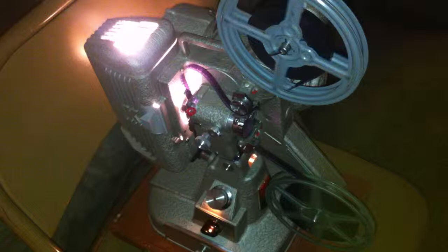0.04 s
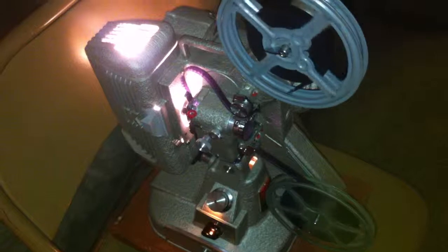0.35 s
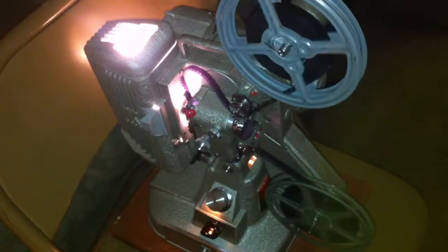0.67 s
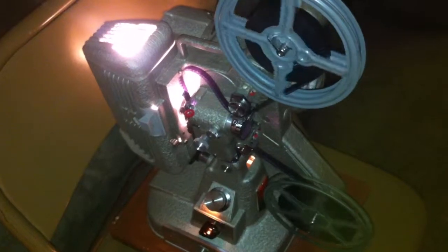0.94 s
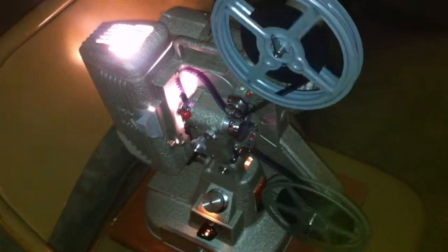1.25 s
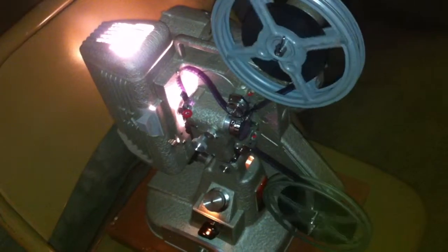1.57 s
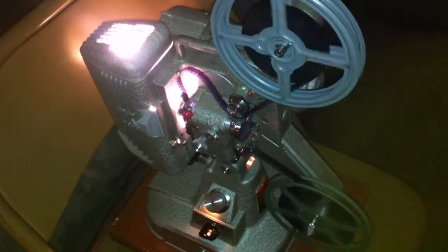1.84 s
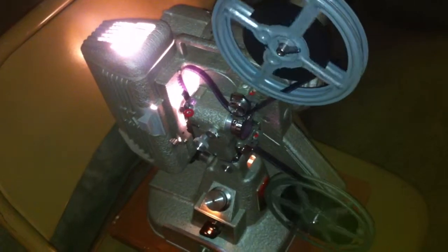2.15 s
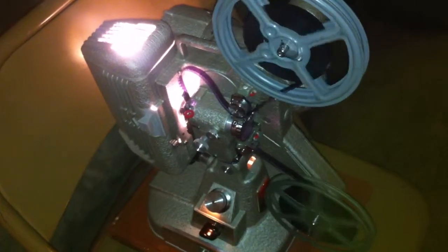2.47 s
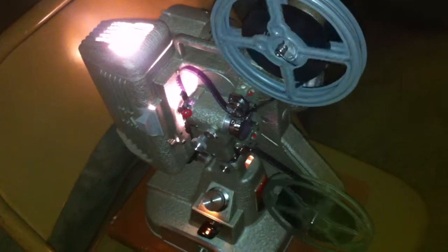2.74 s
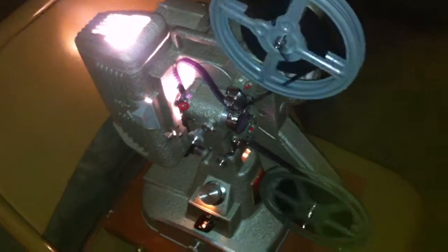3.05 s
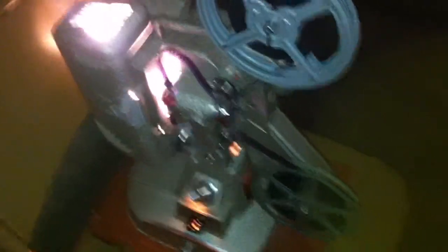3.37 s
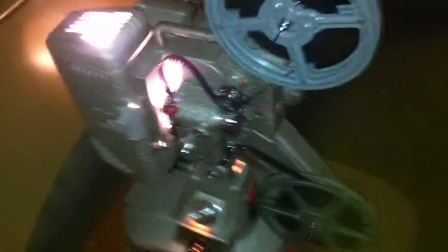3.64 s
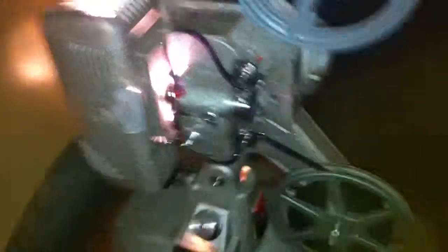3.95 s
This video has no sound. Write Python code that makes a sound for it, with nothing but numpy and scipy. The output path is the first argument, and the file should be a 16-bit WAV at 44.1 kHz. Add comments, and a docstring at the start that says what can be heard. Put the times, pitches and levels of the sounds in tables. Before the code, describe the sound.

Close up in a quiet room, a film projector clatters in a rapid, regular rhythm while its motor whirs and the film rustles. Two soft low bumps pass, then the tone turns a little brighter as the microphone moves nearer.

```python
"""A small film projector runs close to a mono microphone in a quiet room.
The sound cuts in at 0.12 s: motor, gears and belt whine, the fan blows and the film rustles.
Once per picture the cam knocks the housing, the claw snaps at the film, the gears rattle and the
film flicks. Soft low bumps come at 0.23 s and 2.25 s, and a fainter one at 2.8 s.
From 3.4 s the microphone comes closer and the sound brightens a little."""
import sys
import numpy as np
from scipy import signal
from scipy.fft import rfft, irfft
from scipy.io import wavfile

SR = 44100
rng = np.random.default_rng(int(sys.argv[2]) if len(sys.argv) > 2 else 0)


def bounce(signal):
    """Save signal as a 16-bit WAV file at the path given by the first command-line argument."""
    frames = np.transpose(np.atleast_2d(signal))
    limited = np.clip(frames, -1, 1)
    pcm = np.round(limited * 32767).astype(np.int16)
    wavfile.write(sys.argv[1], SR, pcm)


N = 176400
T = np.arange(N) / SR

PICTURE_HZ, MOTOR_HZ, MAINS_HZ, GEAR_TURNS_PER_PICTURE = 15.5155, 75.88, 60, 3
START_S, MOVE_S, MOVE_LENGTH_S = .119, 3.4, .35
FAN_DB, RUSTLE_DB, KNOCK_DB, BACKLASH_DB, CLAW_DB, FLICK_DB = -40, -40.5, -43.5, -45.5, -43.2, -47

# Harmonics of motor shaft, gear shaft and mains (order, level/dB)
MOTOR_HARMONICS = [(2, -58.5), (3, -59.5), (5, -62), (8, -59), (9, -53), (10, -55), (11, -52), (12, -49.7),
                   (14, -52), (16, -55), (24, -55.5)]
GEAR_HARMONICS = [(12, -62), (22, -49), (25, -54), (26, -54), (27, -55.5), (32, -57), (33, -53), (34, -47),
                  (36, -56), (42, -62), (47, -62), (56, -60)]
MAINS_HARMONICS = [(2, -62), (4, -68)]
# Tones of belt and pulleys (f/Hz, level/dB)
BELT_TONES = [(269.5, -62), (639.4, -55), (727.1, -47.3), (743, -58), (1000, -54.5), (1150, -57),
              (1335, -58), (1607.8, -48.3)]
# Modes of housing, claw and small steel parts (f/Hz, bandwidth/Hz, level/dB)
HOUSING_MODES = [(246, 76, -55), (714, 39, -51), (1190, 31, -56), (1655, 33, -45)]
CLAW_MODES = [(4300, 350, -59), (4980, 260, -54), (5730, 190, -52), (8230, 260, -59), (11150, 350, -58.5)]
STEEL_MODES = [(3646, 20, -63), (5035, 110, -54.5), (5600, 170, -57), (7135, 30, -63), (8048, 28, -55),
               (8805, 30, -58), (9115, 50, -60), (10098, 50, -58)]
# Spectral envelopes of the noises and impacts (f/Hz, relative level/dB)
FAN_SPECTRUM = [(25, 2), (60, -48), (100, -27), (170, -11.5), (280, -8.5), (350, -17.5), (500, -1.5),
                (700, -2.5), (870, -13.5), (1250, 4.5), (1450, -3.5), (2250, 0), (2500, -3.5),
                (3100, -13.5), (5000, -6.5), (15000, -58.5)]
RUSTLE_SPECTRUM = [(2000, -15), (3300, -21.5), (3900, -3.5), (4400, -11.5), (6300, -2.5), (7600, 1),
                   (9000, 2), (9500, -0.5), (10000, 3.5), (11000, -1), (12000, -2.5), (13000, -4),
                   (13500, -7), (14000, -2), (15500, -8)]
KNOCK_SPECTRUM = [(300, -25), (900, -4.5), (1350, -3.5), (1650, -2.5), (2000, -2), (2350, -10.5),
                  (2900, -10), (4000, -32.5), (9000, -31.5)]
BACKLASH_SPECTRUM = [(100, -26.5), (400, -7), (700, 1.5), (900, 2), (1200, 3.5), (1450, -8), (2500, -16.5),
                     (6000, -50.5)]
CLAW_SPECTRUM = [(500, -16), (3400, -17), (4100, -7), (5000, -4), (5400, -4), (5750, -3), (6000, -3),
                 (6300, -9), (7700, -6), (8300, -1), (9100, -3), (9600, -8), (10500, -2.5), (11200, -.5),
                 (12000, -4), (13000, -9), (14200, -9), (15200, -1.5), (15700, -5)]
FLICK_SPECTRUM = [(1000, -33), (3200, -2.5), (4200, -10.5), (5500, 11.5), (6500, -15), (8500, 3),
                  (11000, -3.5), (13500, -9), (15500, 1.5)]
# The belt runs slightly ahead and behind (t/s, lag/ms)
BELT_LAG = [(.3, .1), (1.2, -.6), (1.7, .4), (2.5, .6), (3.35, 0), (3.6, -.7), (4, -.2)]
# Impacts of cam and shutter, gears, claw and film in one picture cycle (t/ms, relative level/dB)
CAM_KNOCKS = [(-1.2, -7), (3.8, -12), (6, -10), (9.8, -3), (14, -6), (16.6, 1), (18.4, -1), (20.4, -3),
              (28, -2), (38.3, -9), (40.7, -2), (42.4, -8), (46.8, -6), (49.7, -2), (53.2, -8)]
GEAR_KNOCKS = [(-0.5, -1), (3.5, -2.5), (10, -4), (15.5, -29.5), (25, -1), (32, -17.5), (41, -9.5),
               (46, -5.5)]
CLAW_STRIKES = [(-.65, 0), (.45, -5), (1.45, -5.5), (2.6, -10)]
FILM_FLICKS = [(5.8, -4), (11.2, -3), (15.8, -6), (18.9, 0), (21, -8), (31.6, -1), (35, -7), (48.1, -3),
               (50.9, -1), (54.5, -7)]
# Gains as the microphone moves (t/s, mechanism level/dB, gate level/dB, rustle level/dB)
MICROPHONE_GAINS = [(.12, -0.2, -2, 0.5), (1, -0.2, 0, -0.7), (1.8, -0.36, -0.5, -0.2), (2.5, 0, .5, -0.6),
                    (3.3, 0.3, -1, 0.4), (4, -0.64, -0.5, -0.5)]
# Soft low bumps (t/s, level/dB)
LOW_BUMPS = [(0.234, -41), (2.25, -42), (2.8, -55)]
# Change of spectrum close to the film path (f/Hz, level/dB)
CLOSE_RESPONSE = [(100, 1), (1700, -0.5), (2300, 3.5), (3300, 2.5), (4100, -1), (5800, 0.5), (6300, 3.5),
                  (7100, 5), (8400, 2), (10300, -1), (12000, 1), (13300, 1), (15500, 0)]


def amp(db):
    """Amplitude ratio of a level in decibels."""
    return 10 ** (np.asarray(db) / 20)


def unit(x):
    """Normalisation to rms 1."""
    return x / np.sqrt(np.mean(x ** 2) + 1e-20)


def drift(cutoff_hz):
    """Random fluctuation: low-passed Gaussian noise of rms 1."""
    f = np.fft.rfftfreq(N, 1 / SR)
    return unit(irfft(rfft(rng.standard_normal(N)) * (f > 0) / (1 + (f / cutoff_hz) ** 2), N))


def colour(x, spectrum):
    """Minimum-phase filtering imposes a spectral envelope causally; the result has rms 1."""
    hz, db = np.transpose(spectrum)
    f = abs(np.fft.fftfreq(4096, 1 / SR))
    log_gain = np.log(amp(np.interp(np.log(f + 1), np.log(hz), db)))
    taps = np.fft.ifft(np.exp(np.conj(signal.hilbert(log_gain)))).real
    return unit(signal.oaconvolve(x, taps[:len(taps) // 2])[:N])


def ring(force, modes):
    """Modal superposition: each mode answers the force as a damped resonator."""
    out = np.zeros(N)
    for hz, bandwidth, db in modes:
        radius = np.exp(-np.pi * abs(bandwidth) / SR)
        feedback = [1, -2 * radius * np.cos(2 * np.pi * hz / SR), radius ** 2]
        out += amp(db) * unit(signal.lfilter([1, 0, -1], feedback, force))
    return out


def tones(hz, harmonics, wander, flutter_db):
    """Periodic motion gives harmonics; speed modulates their frequency and load their level."""
    turns = np.cumsum(hz * (1 + wander * drift(2.3))) / SR
    out = np.zeros(N)
    for order, db in harmonics:
        peak = np.sqrt(2) * amp(db + flutter_db * drift(11))
        out += peak * np.sin(2 * np.pi * (round(order) * turns + rng.random()))
    return out


def drive():
    """Forced vibration: motor, gears, belt and mains sound their tones and keep the housing ringing."""
    motor = tones(MOTOR_HZ, MOTOR_HARMONICS, wander=.0015, flutter_db=1.5)
    gears = tones(GEAR_TURNS_PER_PICTURE * PICTURE_HZ, GEAR_HARMONICS, wander=.0013, flutter_db=3)
    belt = sum(tones(hz, [(1, db)], wander=.00192, flutter_db=1.1) for hz, db in BELT_TONES)
    hum = tones(MAINS_HZ, MAINS_HARMONICS, wander=.00009, flutter_db=2.5)
    return motor + gears + belt + hum + ring(rng.standard_normal(N), HOUSING_MODES)


def fan():
    """Turbulence: air blown through the lamp house radiates fluctuating broadband noise."""
    return amp(FAN_DB) * colour(rng.standard_normal(N) * amp(.27 * drift(21)), FAN_SPECTRUM)


def film_rustle():
    """Sliding friction: film in the guides gives a fine, grainy hiss."""
    return amp(RUSTLE_DB) * colour(rng.standard_normal(N) * amp(.76 * drift(400)), RUSTLE_SPECTRUM)


def strikes(pattern, decay_ms, alike, spread_db, jitter_ms):
    """Quasi-periodic excitation: decaying noise bursts recur with each picture, partly correlated."""
    cycles_s = .2989 + np.arange(-3, 59) / PICTURE_HZ
    lag_s = np.interp(cycles_s, *np.transpose(BELT_LAG)) / 1000
    cycles_s = cycles_s + .0225 * (cycles_s < .24) + lag_s  # the first three cycles come late
    cycles_s += .00012 * rng.standard_normal(len(cycles_s))
    ms = np.arange(600) * 1000 / SR
    out = np.zeros(N + SR)
    for at_ms, db in pattern:
        shared = rng.standard_normal(len(ms))
        fresh = rng.standard_normal((len(cycles_s), len(ms)))
        bursts = np.tanh(np.sqrt(alike) * shared + np.sqrt(1 - alike) * fresh) * np.exp(-ms / decay_ms)
        for s, burst, (force, late) in zip(cycles_s, bursts, rng.standard_normal((len(cycles_s), 2))):
            onset = int((s + (at_ms + jitter_ms * late) / 1000) * SR)
            out[onset:onset + len(ms)] += amp(db + spread_db * force) * burst
    return out[:N]


def clatter():
    """Structure-borne sound: cam knocks and gear backlash radiate through the cast housing."""
    knocks = strikes(CAM_KNOCKS, decay_ms=1.4, alike=.15, spread_db=1.2, jitter_ms=.2)
    backlash = strikes(GEAR_KNOCKS, decay_ms=1.9, alike=.068, spread_db=2, jitter_ms=.6)
    knocks = amp(KNOCK_DB) * colour(knocks, KNOCK_SPECTRUM)
    return knocks + amp(BACKLASH_DB) * colour(backlash, BACKLASH_SPECTRUM)


def film_gate():
    """Impact excitation: the claw ticks and pings, the film flicks, and both ring small steel parts."""
    ticks = strikes(CLAW_STRIKES, decay_ms=1, alike=.4, spread_db=.2, jitter_ms=.003)
    impulses = strikes(CLAW_STRIKES[:1], decay_ms=.02, alike=1, spread_db=.5, jitter_ms=.05)
    flicks = strikes(FILM_FLICKS, decay_ms=2.2, alike=.15, spread_db=1, jitter_ms=.15)
    ticks = amp(CLAW_DB) * colour(ticks, CLAW_SPECTRUM)
    flicks = amp(FLICK_DB) * colour(flicks, FLICK_SPECTRUM)
    return ticks + ring(impulses, CLAW_MODES) + flicks + ring(.2 * ticks + flicks, STEEL_MODES)


def room(x, level_db=-13, t60_s=.18):
    """Reverberation: sparse reflections arrive after 4 ms and decay exponentially."""
    t = T[:SR // 2]
    reflections = rng.standard_normal(len(t)) * (rng.random(len(t)) < .05) * (t > .004)
    reflections *= np.exp(-np.log(1000) * t / t60_s)
    return amp(level_db) * signal.oaconvolve(x, reflections / np.linalg.norm(reflections))[:N]


def bumps(hz=114, decay_s=.007):
    """Damped oscillation: each soft bump is a low sine that dies within a few periods."""
    out = np.zeros(N)
    for s, db in LOW_BUMPS:
        age = np.maximum(T - s, 0)
        out += amp(db) * np.sin(2 * np.pi * hz * age) * np.exp(-age / decay_s)
    return out


def move_closer(x):
    """Timbre depends on position: a crossfade to the spectrum heard close to the film path."""
    gain = amp(np.interp(np.fft.rfftfreq(N, 1 / SR), *np.transpose(CLOSE_RESPONSE)))
    close = irfft(rfft(x) * gain, N)
    return x + np.clip((T - MOVE_S) / MOVE_LENGTH_S, 0, 1) * (close - x)


def scene():
    """Superposition: all sources add at one microphone, the same in both channels."""
    s, *levels = np.transpose(MICROPHONE_GAINS)
    mechanism_gain, gate_gain, rustle_gain = (amp(np.interp(T, s, db)) for db in levels)
    impacts = mechanism_gain * clatter() + gate_gain * film_gate()
    reverberation = room(impacts)
    steady = mechanism_gain * (drive() + fan()) + rustle_gain * film_rustle()
    mono = move_closer(steady + impacts + reverberation) + bumps()
    return np.array([mono, mono])


def record(dry):
    """Band limiting: the microphone passes 80 Hz to 15.75 kHz; the sound cuts in over 2 ms."""
    high_pass = signal.butter(3, 80, "high", fs=SR, output="sos")
    low_pass = signal.firwin(801, 15750, window=("kaiser", 9), fs=SR)
    opened = signal.sosfilt(high_pass, dry) * np.clip((T - START_S) / .002, 0, 1)
    return signal.oaconvolve(opened, low_pass[None], "same")


dry = scene()
out = record(dry)
bounce(out)
```